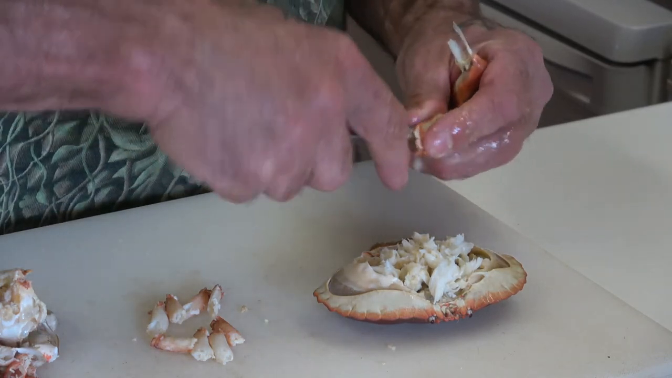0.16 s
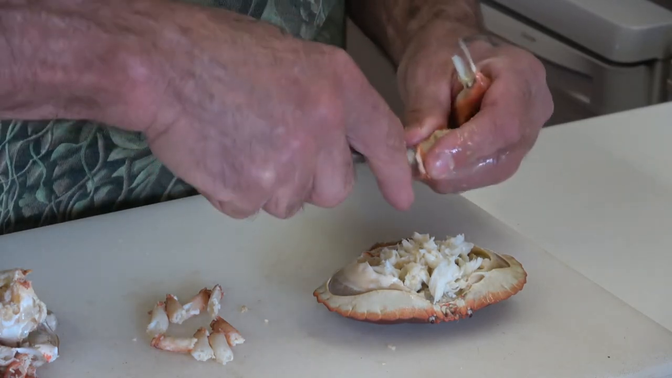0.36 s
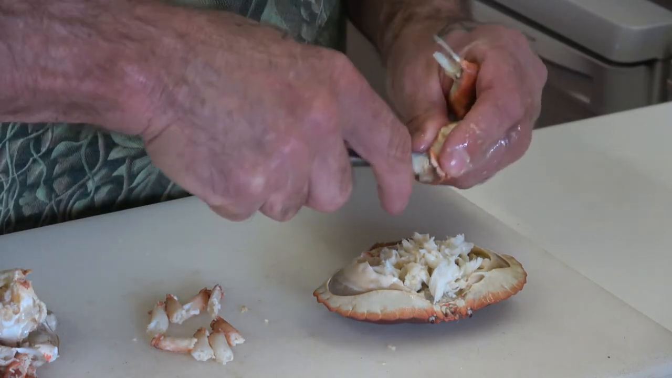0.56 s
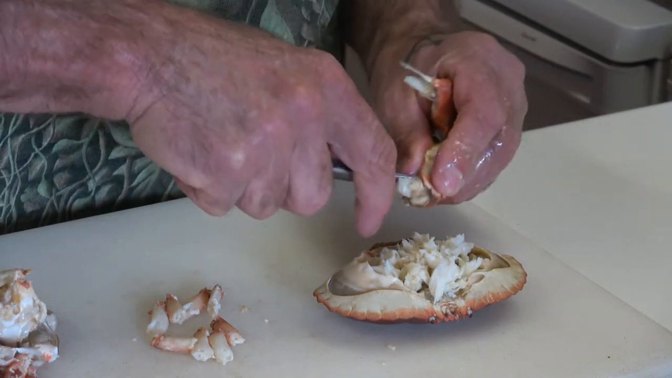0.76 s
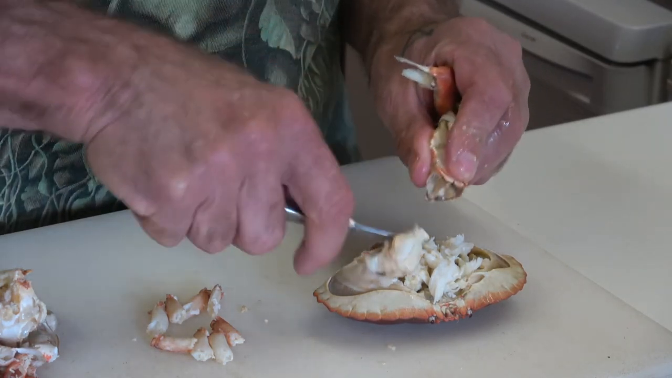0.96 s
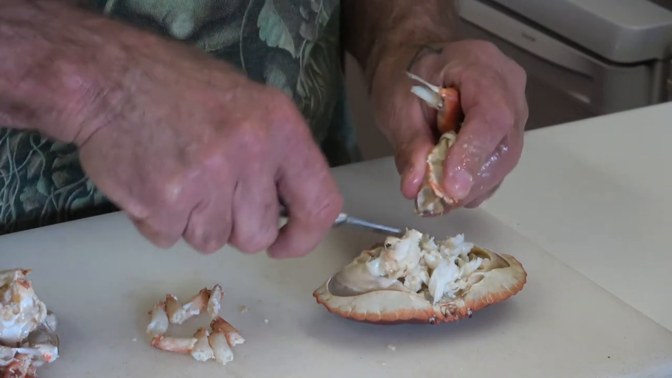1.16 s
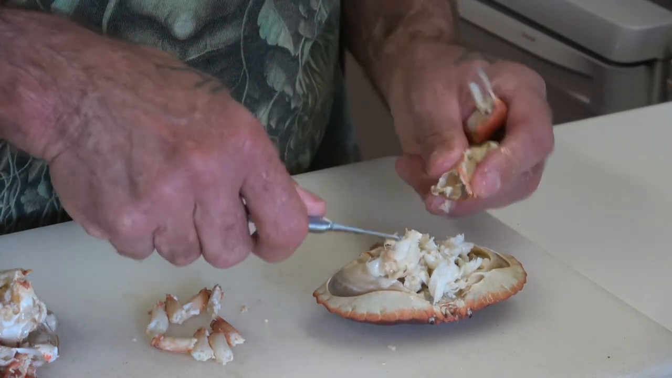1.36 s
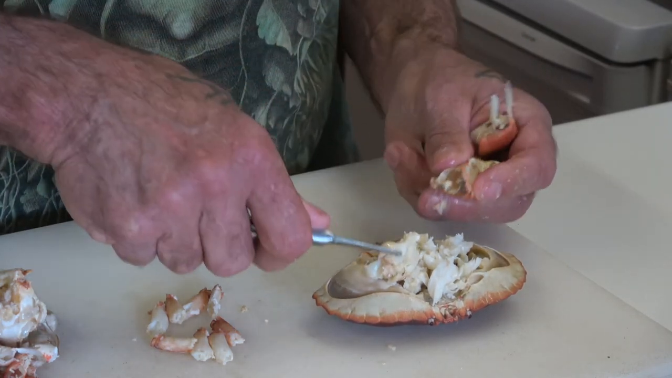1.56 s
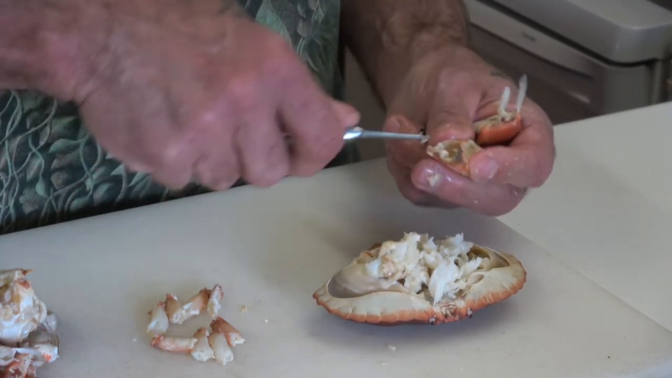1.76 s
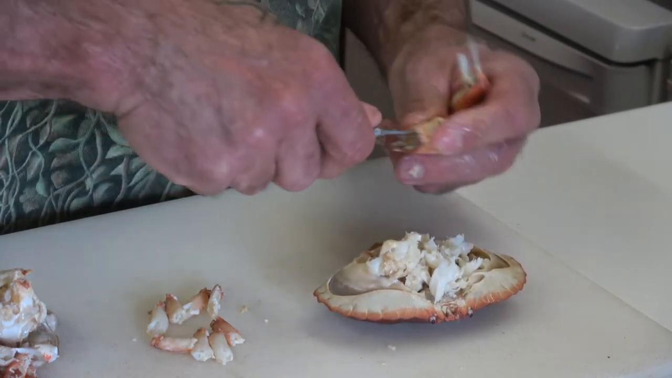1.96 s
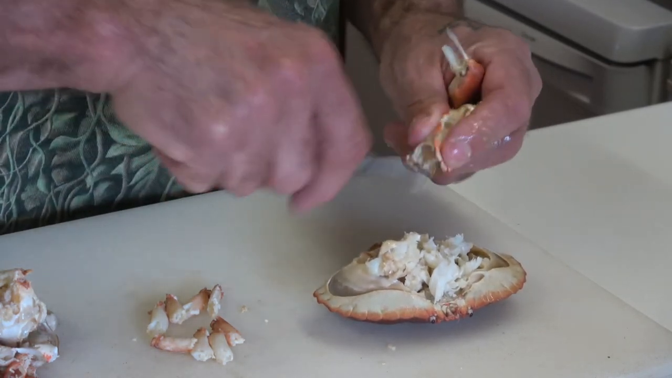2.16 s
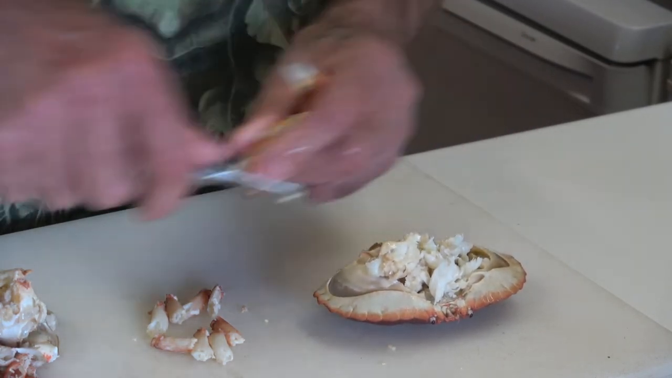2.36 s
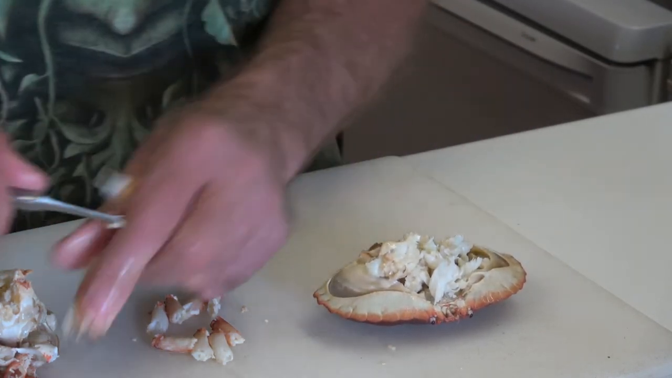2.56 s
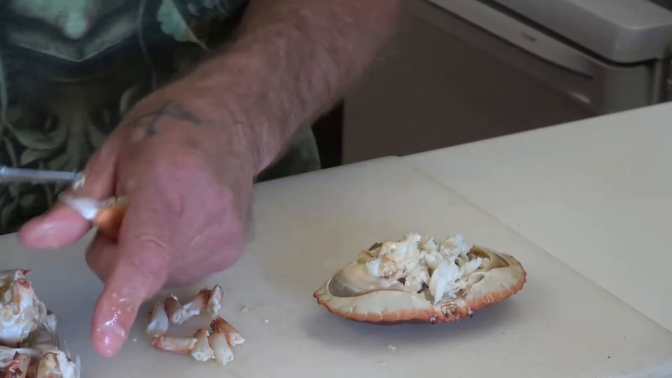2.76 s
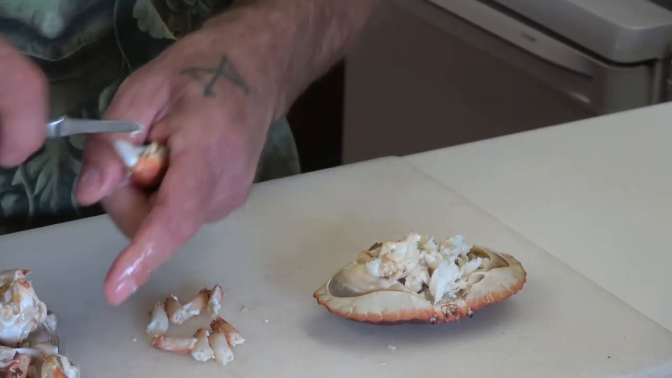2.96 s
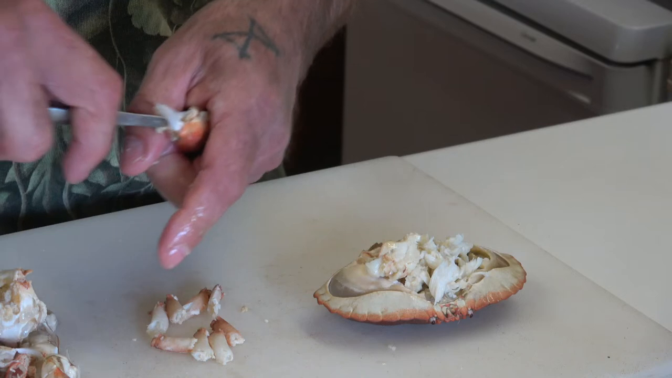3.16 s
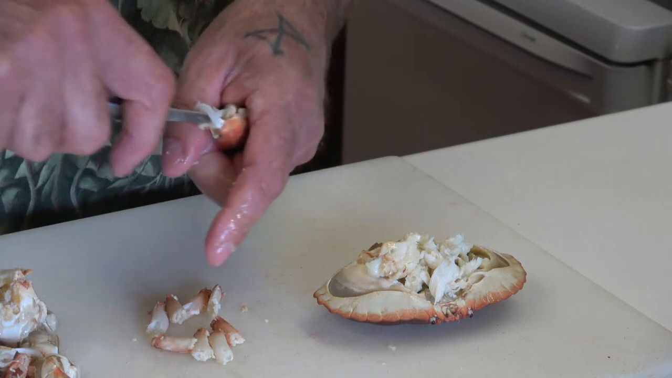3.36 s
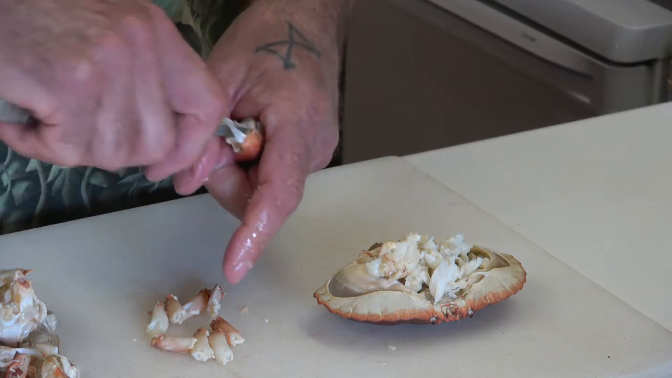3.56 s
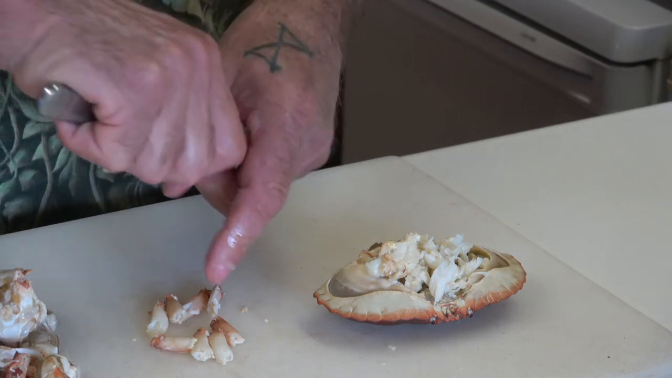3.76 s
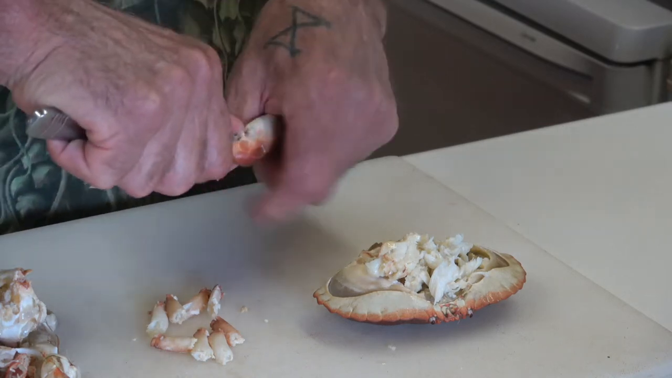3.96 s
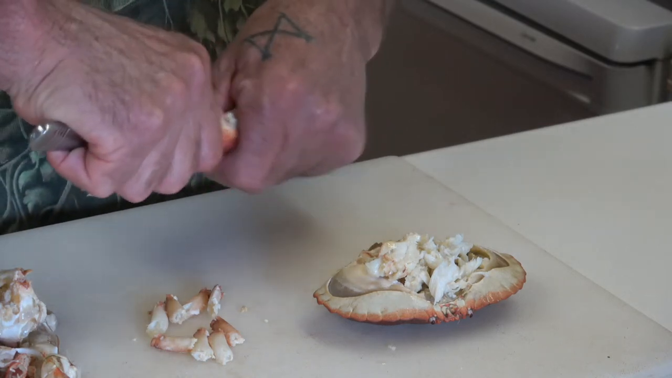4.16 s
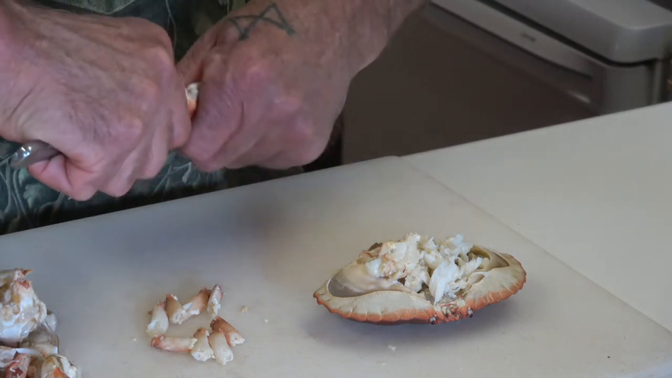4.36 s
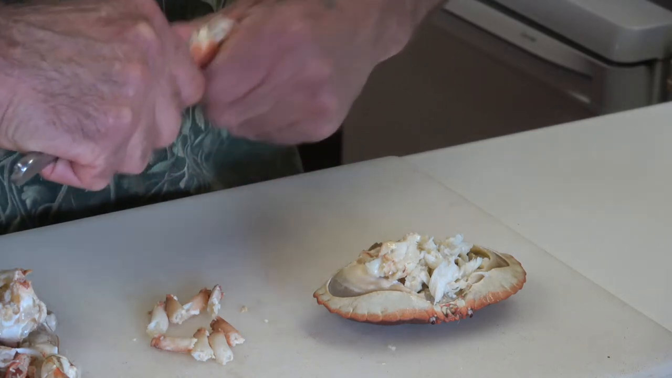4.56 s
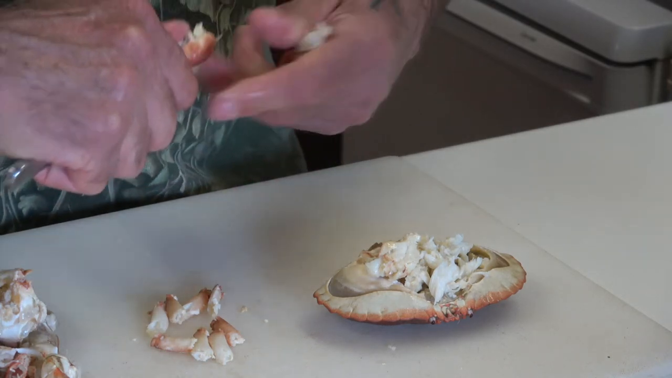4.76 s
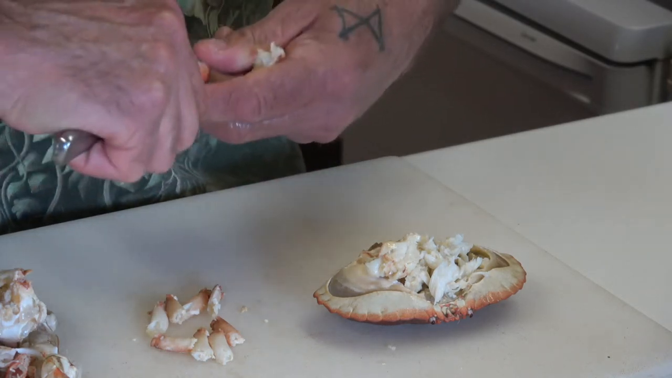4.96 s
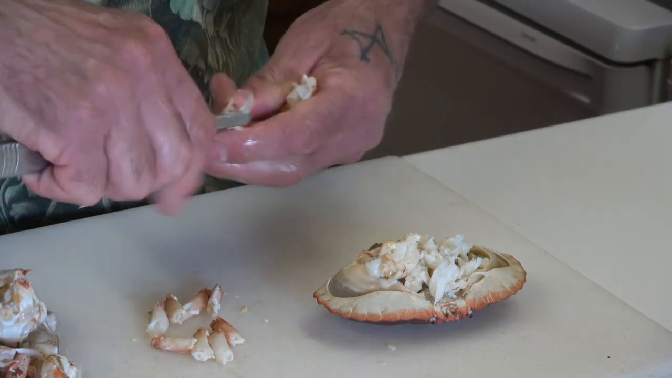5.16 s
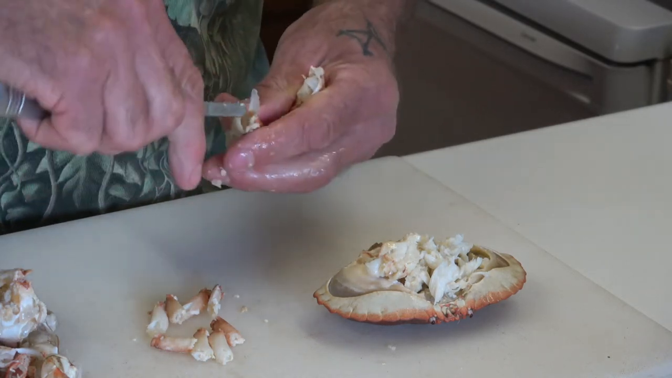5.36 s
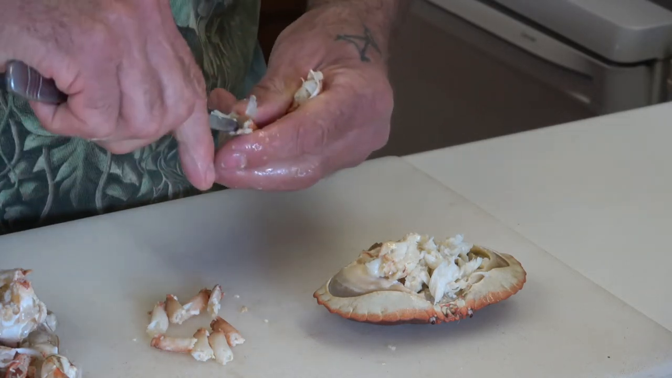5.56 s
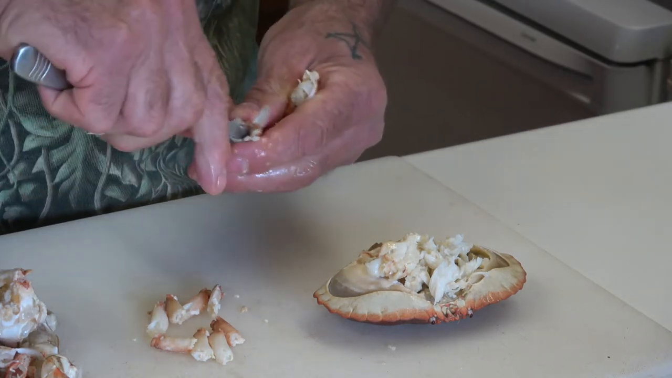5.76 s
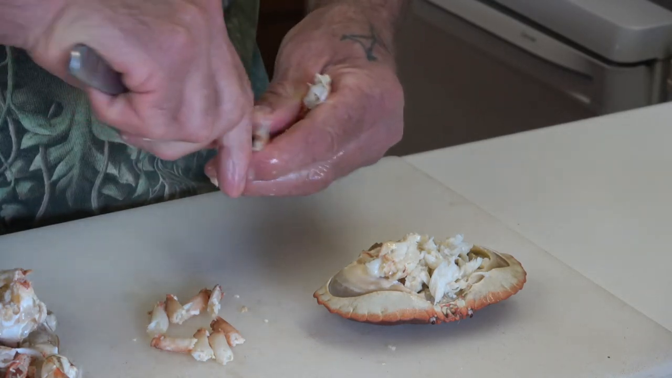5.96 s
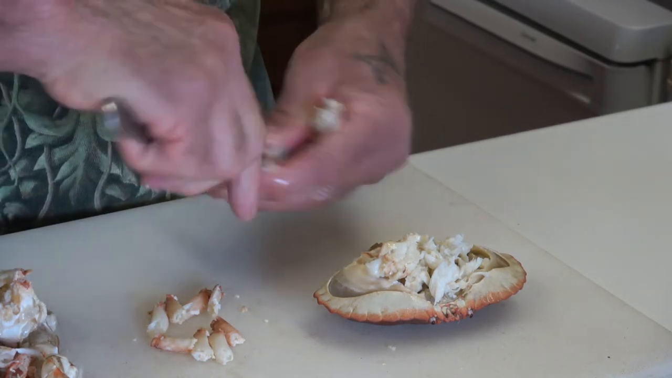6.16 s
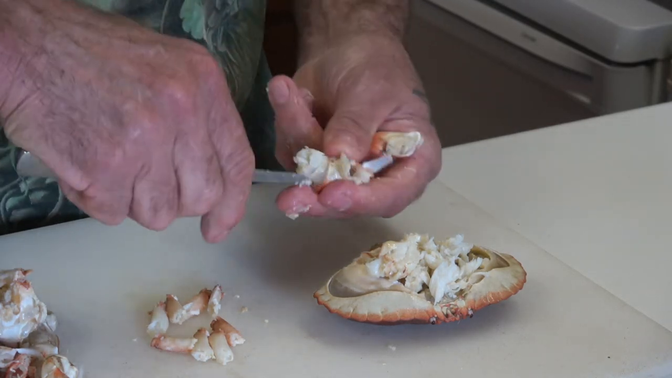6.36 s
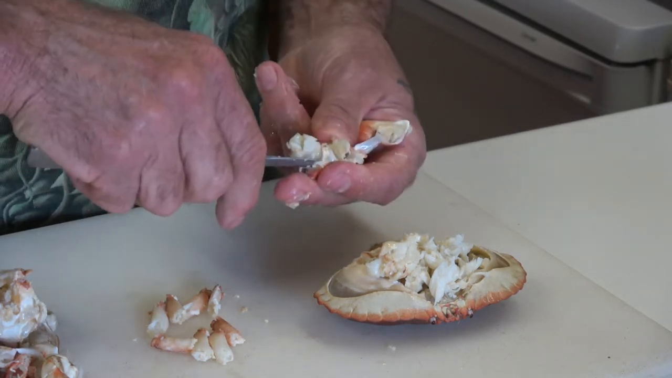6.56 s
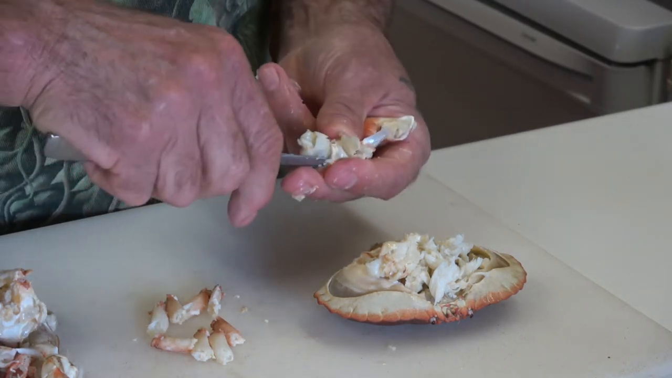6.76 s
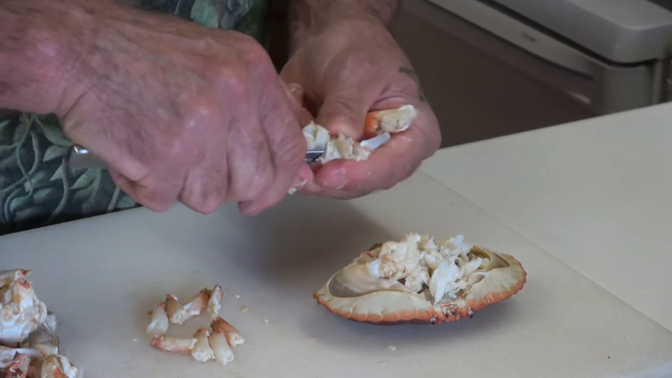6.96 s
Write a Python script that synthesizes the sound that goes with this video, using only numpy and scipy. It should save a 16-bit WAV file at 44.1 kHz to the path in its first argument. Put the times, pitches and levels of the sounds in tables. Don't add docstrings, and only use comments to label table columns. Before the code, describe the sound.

Sharp brittle snaps and small wet clicks of crab shell being picked close by, a shell drop, and faint traffic rumble behind.

```python
import sys
import numpy as np
from scipy import signal
from scipy.io import wavfile
from scipy.ndimage import uniform_filter1d

SR = 44100
rng = np.random.default_rng(int(sys.argv[2]) if len(sys.argv) > 2 else 0)


def dump(signal):
    limited = np.clip(np.atleast_2d(signal).T, -1, 1)
    pcm = np.round(limited * 32767).astype(np.int16)
    wavfile.write(sys.argv[1], SR, pcm)


def invert_db(level):
    return 10 ** (np.asarray(level, dtype=float) / 20)


N = 308700


def evened(x):
    return x / np.sqrt(np.mean(x ** 2) + 1e-20)


def peaked(x):
    return x / (abs(x).max() + 1e-12)


def read(points, hz):
    f, value = np.transpose(points)
    return np.interp(np.log(hz + 1), np.log(f + 1), value)


def add(mix, s, sound):
    part = mix[round(s * SR):][:len(sound)]
    part += sound[:len(part)]


def above(x, hz):
    return signal.sosfilt(signal.butter(3, hz, "high", fs=SR, output="sos"), x)


def resonate(x, hz, width):
    turn = np.exp(2j * np.pi * np.cumsum(hz * np.ones(len(x))) / SR)
    r = np.exp(-np.pi * width / SR)
    return 2 * (turn * signal.lfilter([1 - r], [1, -r], x / turn + 1e-18)).real


def steep(x, hz, width):
    return resonate(resonate(x, hz, width), hz, width)


def wash(spectrum, patchy_db):
    frames, hz = N // 512 + 5, np.fft.rfftfreq(2048, 1 / SR)
    a, b, patches = rng.standard_normal((frames, 1025, 3)).T
    patches = uniform_filter1d(patches, size=8, axis=0)
    patches = evened(uniform_filter1d(patches, size=8, axis=1))
    z = (a + 1j * b) * invert_db(read(spectrum, hz)[:, None] + patchy_db * patches)
    return evened(signal.istft(z, nperseg=2048, noverlap=1536)[1][:N])


# frequency in Hz, level in dB per Hz.
QUIET = [(12, -30), (20, -0.5), (55, 11), (77, -6.5), (193, -13.5), (270, -9.5), (301, -16.5), (422, -10.5),
         (459, -17.5), (499, -23.5), (542, -9), (642, -14.5), (2460, -24), (3950, -27.5), (16000, -33)]


def quiet():
    return invert_db(-52.5) * wash(QUIET, patchy_db=1.5)


# time in seconds, level in dB.
CAR = [(0, -47), (.1, -49), (.4, -47), (.56, -45.5), (.82, -46), (1.27, -52), (1.55, -48.5), (2.05, -52),
       (2.22, -50.5), (2.38, -53.5), (2.55, -51), (2.86, -61.5), (3.4, -61.5), (5.0, -63.5), (6.4, -65),
       (7, -61.5)]
# frequency in Hz, level in dB per Hz.
TYRES = [(200, -26), (350, -8), (600, -6.5), (950, -1), (1300, -6.5), (2000, -21), (3500, -28.5),
         (7000, -41.5)]
# frequency in Hz, level in dB per Hz.
ENGINE = [(20, -15.5), (50, 2), (100, -1.5), (160, -5), (240, -7), (320, -27), (500, -56)]


def car():
    near_db = np.interp(np.arange(N) / SR, *np.transpose(CAR)) + 52
    tyres = invert_db(-53.5 + 0.88 * near_db) * wash(TYRES, patchy_db=1.0)
    engine = invert_db(-48 + 0.94 * near_db) * wash(ENGINE, patchy_db=3.5)
    return tyres + engine


# frequency in Hz, level in dB.
HUM = [(156, -67.5), (301.5, -65.5), (466, -69), (544, -69.5), (595, -71.5), (990, -74), (1879, -77),
       (3290, -81.5)]


def hum():
    return sum(invert_db(db) * evened(resonate(rng.standard_normal(N), hz, 3.8)) for hz, db in HUM)


# start in seconds, end in seconds.
BRITTLE = [
    (.4, .5),
    (2.16, 2.22),
    (4.26, 4.5),
]


def snap(s, blow_db, hollow_hz, width, treble_db, thud_db):
    t = np.arange(500) / SR
    crack = rng.standard_normal(len(t))
    air_db = 6 if any(start < s < end for start, end in BRITTLE) else -14
    if hollow_hz < 4000:
        push = np.append(np.hanning(9), np.zeros(len(t) - 9))
    else:
        push = 1. * (t == 0)
    ring = peaked(above(steep(push, hollow_hz, .55 * width), .6 * hollow_hz))
    thud = peaked(above(steep(push, 936.0, 780.0), 480.0))
    body = ring + invert_db(thud_db - 7.5) * thud
    bright = []
    # (decay in s, air lift in dB)
    for tau, lift_db in (.0009, 0), (.00005, 3.5):
        splinter = np.append(1.5, crack[1:]) * np.exp(-t / tau)
        edge = resonate(steep(above(splinter, 4500.0), 4000.0, 6800.0), 5500., 6000.)
        air = steep(above(splinter, 11600.0), 10500.0, 5400.0)
        air *= invert_db(0.43 * blow_db + air_db + lift_db)
        bright.append(0.69 * np.linalg.norm(ring) * (edge + air) / np.linalg.norm(edge))
    return invert_db(blow_db) * (body + invert_db(treble_db) * np.array(bright))


SLACK_THUD_DB = -19


# time in seconds, blow in dB, centre in Hz.
TICKS = [(.047, -43.5, 7640), (0.955, -46, 6100), (1.9806, -11.5, 4660), (2.2, -20.5, 8900),
         (2.4554, -41, 7540), (3.899, -50, 6000), (3.974, -48, 9000), (4.065, -48, 5200),
         (4.087, -44, 5300), (4.093, -45, 5000), (4.106, -46, 7000), (4.215, -49, 6450),
         (4.3134, -54, 5130), (4.5825, -37, 6300), (4.62, -47, 8000), (4.6664, -30, 4970),
         (4.7327, -44, 7540), (4.74, -51, 6200), (4.8532, -49, 4840), (5.0024, -48, 7770),
         (5.047, -50, 12000), (5.0947, -46, 9000), (5.2585, -45, 4290), (5.809, -55, 6560),
         (5.9168, -47, 5880), (5.9996, -51, 5100), (6.01, -35, 4560), (6.094, -44, 5900),
         (6.212, -39, 4440), (.972, -35.5, 7600)]


def ticks():
    return [(s, db, hz, 3500, -37 - .53 * db, SLACK_THUD_DB) for s, db, hz in TICKS]


# time in seconds, blow in dB, hollow in Hz, treble in dB.
FREE = [(.3673, -40.5, 2450, -4), (.4297, -13.5, 2490, -3.5), (.4297, -20.5, 4500, -12),
        (.869, -41, 4550, -14), (1.4465, -39, 3550, 3), (1.7388, -38.5, 3350, -8.5), (2.012, -26, 2900, -6),
        (2.604, -32, 915, -26), (3.6772, -41, 4120, -22), (4.269, -42, 2660, 4), (4.2739, -36.5, 2650, -12),
        (4.4696, -21, 10300, -11), (5.9372, -45, 2500, -1), (5.9822, -52, 3460, -10),
        (6.0364, -30.5, 4130, -12), (6.05, -29, 3520, -17), (6.9585, -32, 4050, -9),
        (6.9658, -30, 4120, -20)]
# time in seconds, blow in dB, hollow in Hz, treble in dB.
GRIPPED = [(.413, -26.5, 2260, 5), (.9637, -20.5, 2065, -14.5), (1.9803, -22.5, 2520, 6),
           (2.1971, -26.5, 2870, 0), (4.285, -30.5, 2600, -2), (4.3194, -29.5, 1670, 0),
           (4.3394, -43, 2760, -5), (4.4581, -14.5, 2150, 10), (4.4602, -4.5, 2490, -2),
           (4.4867, -14, 2400, -4), (4.6375, -37.5, 2480, -4), (6.0417, -32.5, 4360, -16),
           (6.0541, -31.5, 4045, -19), (6.2558, -45, 6830, 3), (6.9425, -49, 3980, -18),
           (6.951, -46.5, 4130, -8)]
# time in seconds, blow in dB, hollow in Hz, treble in dB.
DEEP = [(.4745, -21.5, 2570, -0.5), (.8689, -35.5, 2800, -9), (.9927, -49, 2150, -4),
        (1.9164, -28, 2360, -1.5), (2.0772, -30.5, 2780, 0.5), (2.1708, -28, 3020, -18),
        (2.1792, -31, 2630, 1.5), (2.1887, -26.5, 2200, -12), (2.2006, -27.5, 2370, -12),
        (2.2371, -29, 2580, -2.5), (4.3262, -33, 2540, -13), (4.383, -42, 2390, -20),
        (4.4176, -46, 2400, -22), (4.6466, -39.5, 3300, 8), (5.9654, -46, 2860, -6),
        (6.0629, -36, 3860, -19), (6.9736, -30.5, 6170, 2), (6.981, -35, 4000, -4)]


def cracks():
    rows = []
    for holds, width, thud_db in (FREE, 930, SLACK_THUD_DB), (GRIPPED, 810, -9), (DEEP, 790, 0.5):
        rows += [(s, db, hz, width, treble_db, thud_db) for s, db, hz, treble_db in holds]
    return rows


def stroke(rows, spread):
    s, *columns = np.transpose(rows)
    t = np.arange(s[0], s[-1], 1 / SR)
    pressure_db, hollow_hz, treble_db = (np.interp(t, s, c) for c in columns)
    chance, sign, size, spot = rng.random((len(t), 4)).T
    slips = (chance < 2600 / SR) * np.sign(sign - .5)
    slips *= invert_db(-3.2 * np.log(size + 0.014))
    spot = np.repeat(spot[::130], 130)[:len(t)]
    wander_hz = hollow_hz * (1 + spread * (0.48 * spot ** 2 - .15))
    body = evened(above(steep(slips, wander_hz, spread * 1700.0), 1300.0))
    rustle = evened(steep(above(slips, 1330.0), 5150.0, 6000.0))
    fizz = evened(steep(steep(above(slips, 3220.0), 7200.0, 7000.), 7650.0, 9400.0))
    grit = body + invert_db(treble_db) * (fizz + 0.95 * rustle)
    return s[0], invert_db(pressure_db - 6.5) * grit * signal.windows.tukey(len(t), .15)


def stretched(moves, shape, spread):
    strokes = []
    for s, length, db, hz, treble_db in moves:
        rows = [(s + share * length, db + shape_db, hz, treble_db) for share, shape_db in shape]
        strokes.append((rows, spread))
    return strokes


# start in seconds, length in seconds, pressure in dB, hollow in Hz,
# treble in dB.
SKIDS = [(.408, 0.064, -31, 2620, 0.5), (.864, 0.076, -43, 2780, -4), (2.44, 0.12, -66, 5000, 7),
         (3.73, 0.37, -54, 2480, -13), (4.266, 0.087, -45, 2650, 4.5), (4.314, 0.063, -35, 2520, 1.5),
         (4.625, 0.08, -35.5, 3570, -17), (6.2, 0.07, -41.5, 3050, -10.5), (6.245, 0.047, -44, 3950, -4)]
# share of length 0-1, pressure in dB.
SKID_SHAPE = [(0, -17), (.14, -3), (.55, -15), (1, -13)]


def skids():
    return stretched(SKIDS, SKID_SHAPE, 1.0)


# time in seconds, level in dB, frequency in Hz.
BUMPS = [
    (0.504, -35.5, 79.5),
    (0.546, -36, 71),
    (.643, -27.5, 86.5),
]


def bumps():
    out, t = np.zeros(N), np.arange(1500) / SR
    for s, db, hz in BUMPS:
        add(out, s, invert_db(db) * np.hanning(len(t)) * np.sin(2 * np.pi * hz * t))
    return out


# start in seconds, length in seconds, pressure in dB, hollow in Hz,
# treble in dB.
DRAGS = [(6.94, 0.073, -42.5, 2820, -5.5), (.578, 0.051, -52, 4780, 3.5), (2.035, 0.073, -43, 2880, -8),
         (2.13, 0.12, -34.5, 2730, -9), (3.85, 0.51, -63, 2920, -3.5), (5.76, 0.081, -58, 2970, -0.5),
         (5.94, 0.15, -50, 3920, -14), (6.025, 0.062, -40, 3950, -27), (6.1, 0.054, -54, 3300, -10)]
# share of length 0-1, pressure in dB.
DRAG_SHAPE = [(0, -39), (.25, -1.5), (.5, 3.5), (.7, -1.5), (1, -19)]


def drags():
    return stretched(DRAGS, DRAG_SHAPE, 1.0)


# time in seconds, blow in dB, hollow in Hz.
KNOCKS = [
    (1.738, -33, 1400),
    (2.606, -55, 1300),
    (3.6776, -34.5, 1390),
]


def knocks():
    return [(*row, 1500, -25, 8) for row in KNOCKS]


# time in seconds, level in dB, frequency in Hz.
PINGS = [
    (1.739, -59, 3400),
    (1.981, -33.5, 2850),
    (2.2, -48, 6300),
    (6.062, -50, 3400),
    (6.213, -62, 6300),
    (6.256, -56, 6900),
]


def pings():
    out, t = np.zeros(N), np.arange(SR // 5) / SR
    for s, db, hz in PINGS:
        add(out, s, invert_db(db - 60 * t / 0.12) * np.sin(2 * np.pi * hz * t))
    return out


# time in seconds, blow in dB.
DROP = [
    (2.726, 0),
    (2.724, -24),
    (2.7302, -15),
    (2.7375, -13.5),
    (2.753, -15),
    (2.775, -31),
]
# frequency in Hz, width in Hz, level in dB.
BOARD = [(165, 130, -16), (505, 460, -0.5), (1090, 440, 11), (1560, 1200, 11), (2400, 1760, 13.5),
         (3250, 650, 7.5), (3670, 1400, 2), (5000, 1400, 4), (7400, 1400, -3), (11300, 3400, -6)]


def drop():
    pushes, out, first = np.zeros(6000), np.zeros(N), min(DROP)[0]
    for s, db in DROP:
        add(pushes, s - first, invert_db([db]))
    sound = 0
    for k, (hz, width, db) in enumerate(BOARD):
        sound = sound + (-1) ** k * invert_db(db) / width * steep(pushes, hz, width)
    add(out, first, invert_db(DROP[0][1]) * peaked(sound))
    return out


# start in seconds, length in seconds, pressure in dB, hollow in Hz, treble in dB.
RIPS = [
    (4.452, 0.082, -19.5, 2400, -9),
    (6.935, 0.08, -37, 4230, -10.5),
]


def rips():
    return stretched(RIPS, DRAG_SHAPE, .4)


# time in seconds, blow in dB.
TEAR = [
    (4.4803, -14.5),
    (4.499, -19),
]


def tear():
    return [(*row, 2400, 900, 0, SLACK_THUD_DB) for row in TEAR]


# frequency in Hz, 60 dB decay time in seconds.
ROOM = [(300, 0.26), (1000, 0.28), (2500, 0.2), (5000, 0.23), (9000, 0.25), (15000, 0.21)]


def room(x):
    out, turn = np.zeros(N), np.arange(N) / SR * 7
    for k in range(3):
        taps = np.zeros(SR // 2)
        at = np.arange(0, SR // 2 - 20, 20) + rng.integers(0, 20, (SR // 2 - 1) // 20)
        taps[at] = rng.standard_normal(at.shape)
        hz, t, z = signal.stft(taps, SR, nperseg=128)
        tail = signal.istft(z * invert_db(-60 * t / read(ROOM, hz)[:, None]), SR, nperseg=128)[1]
        after = np.maximum(np.arange(len(tail)) / SR - 0.0033, 0)
        tail *= (after > 0) * (1 - 0.067 * np.exp(-after / 0.066))
        tail *= invert_db(-3 * np.clip((after - 0.0053) / 0.002 + 1, 0, 1))
        share = np.sqrt(2 / 3) * np.cos(turn + k * np.pi / 3)
        out += signal.fftconvolve(x * share, tail / np.linalg.norm(tail))[:N]
    return signal.lfilter(*signal.butter(1, 7000., fs=SR), out)


def scene():
    background = quiet() + car() + hum() + bumps()
    snaps, sent, grit = np.zeros((3, N))
    for blow in ticks() + cracks() + knocks() + tear():
        near, far = snap(*blow)
        add(snaps, blow[0] - .0002, near)
        add(sent, blow[0] - .0002, far)
    for move in skids() + drags() + rips():
        add(grit, *stroke(*move))
    grit += pings()
    landing = drop()
    echo = room(sent + invert_db(-3) * grit + invert_db(3) * landing)
    return (snaps + grit + landing + invert_db(-6) * echo + background)[None]


def top_cut(x):
    return signal.sosfilt(signal.butter(12, 16820, fs=SR, output="sos"), x)


def record(dry):
    limit = .56
    limited = limit * np.tanh(dry / limit)
    limited = signal.oaconvolve(limited, signal.firwin(127, 16000, fs=SR)[None], "same")
    return top_cut(limited)


dry = scene()
out = record(dry)
dump(out)
```